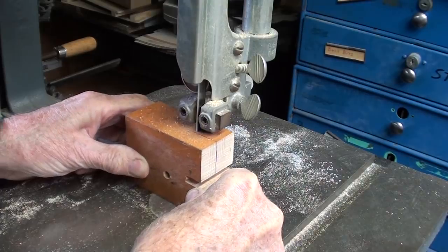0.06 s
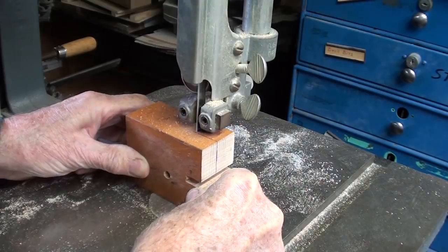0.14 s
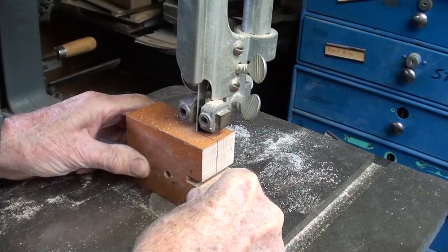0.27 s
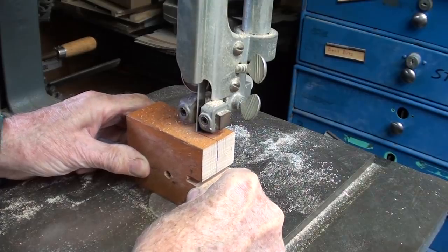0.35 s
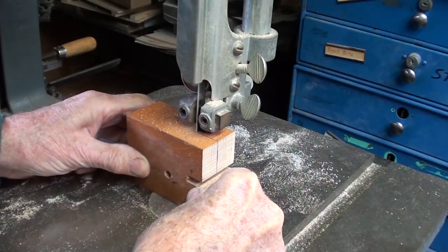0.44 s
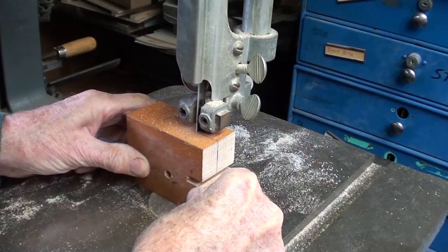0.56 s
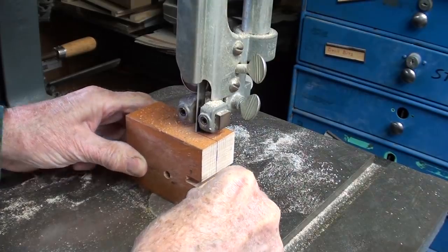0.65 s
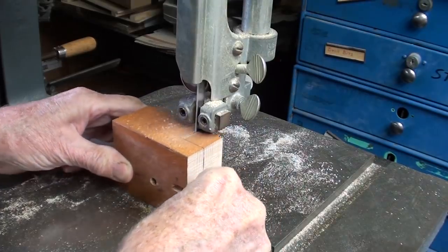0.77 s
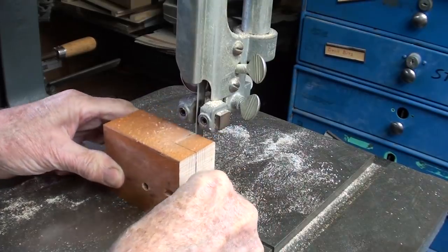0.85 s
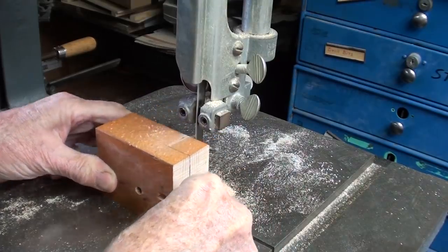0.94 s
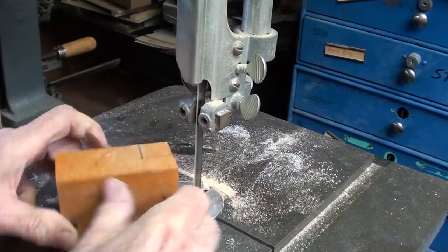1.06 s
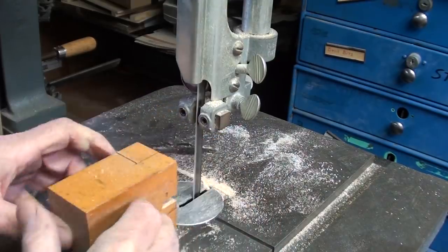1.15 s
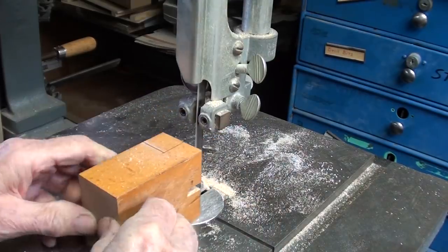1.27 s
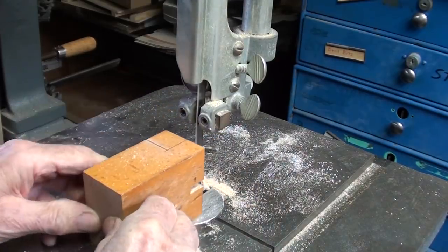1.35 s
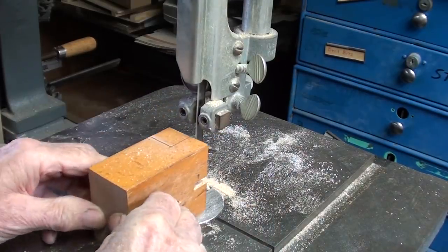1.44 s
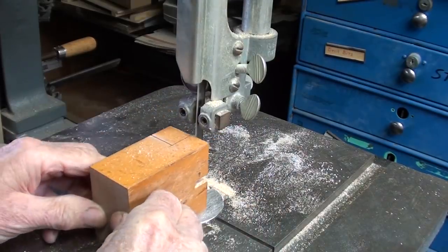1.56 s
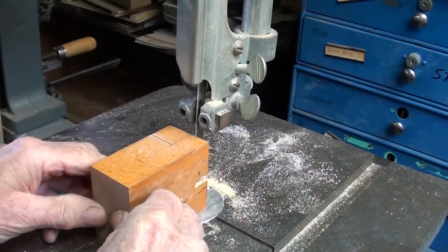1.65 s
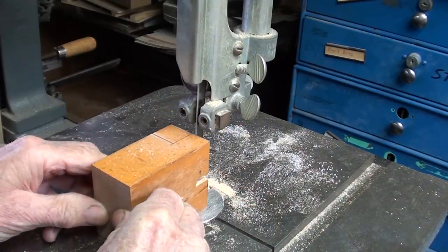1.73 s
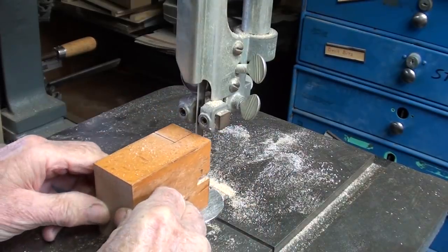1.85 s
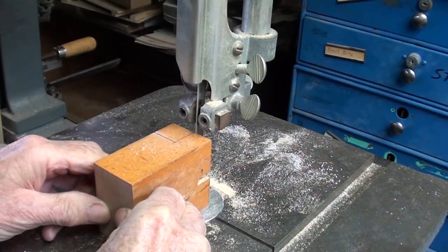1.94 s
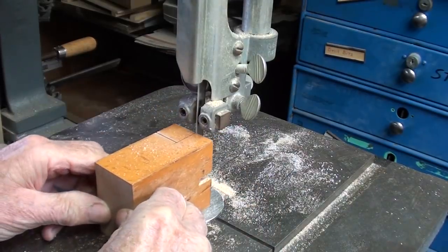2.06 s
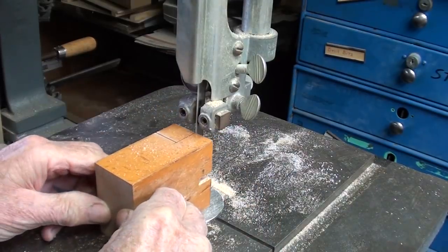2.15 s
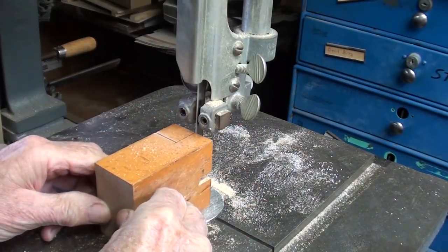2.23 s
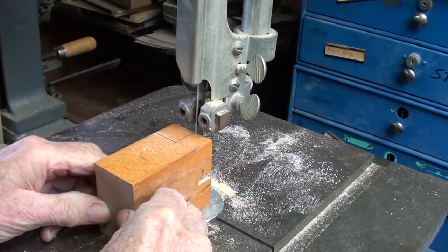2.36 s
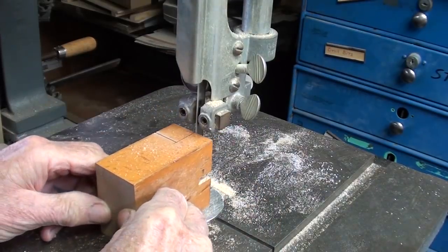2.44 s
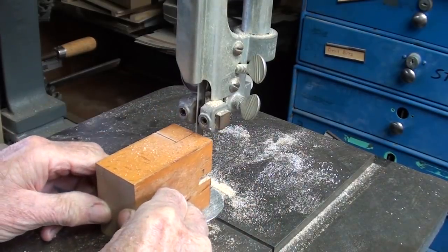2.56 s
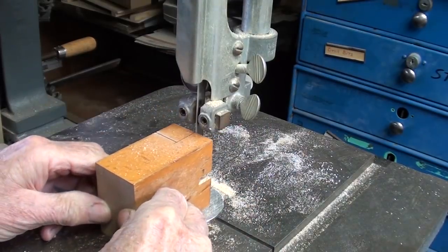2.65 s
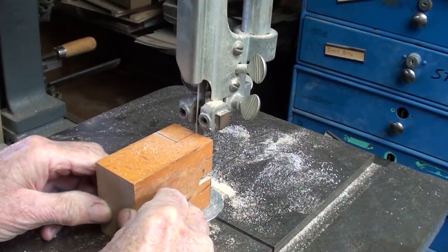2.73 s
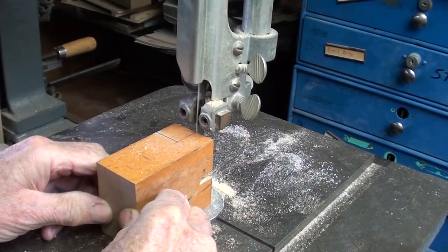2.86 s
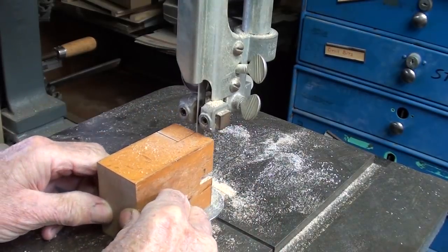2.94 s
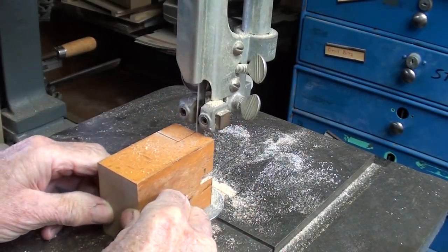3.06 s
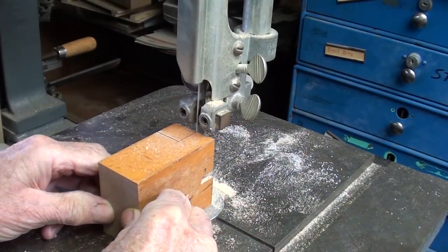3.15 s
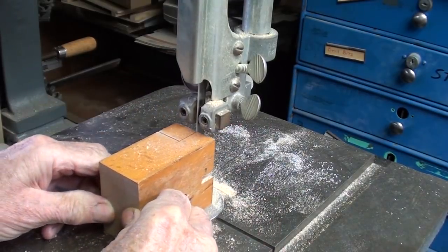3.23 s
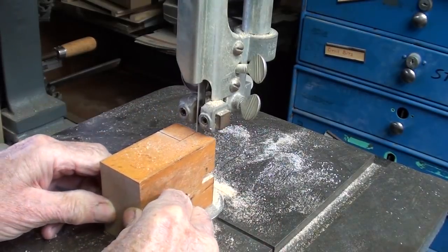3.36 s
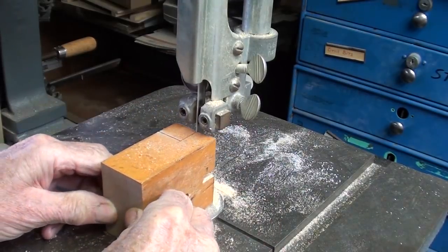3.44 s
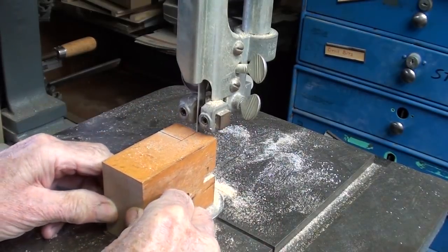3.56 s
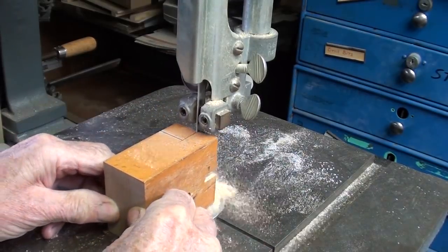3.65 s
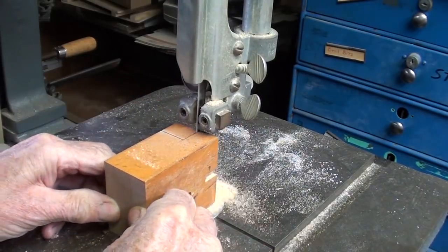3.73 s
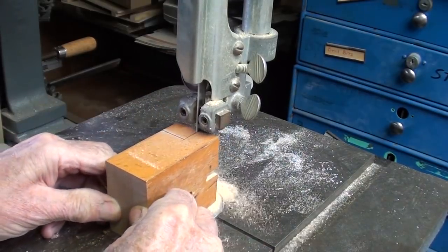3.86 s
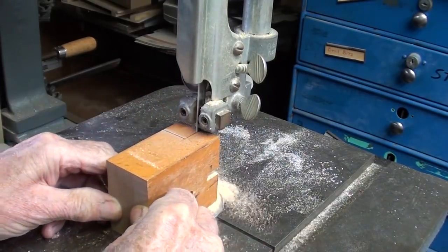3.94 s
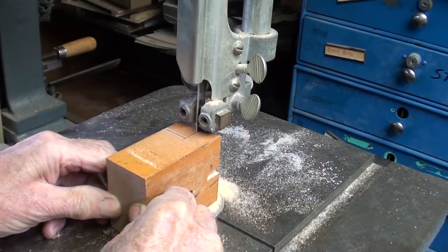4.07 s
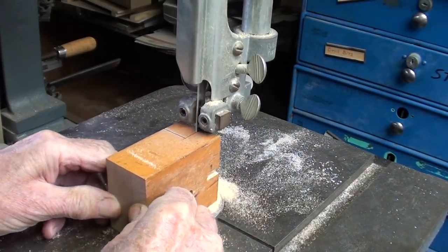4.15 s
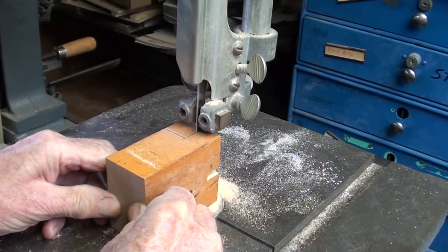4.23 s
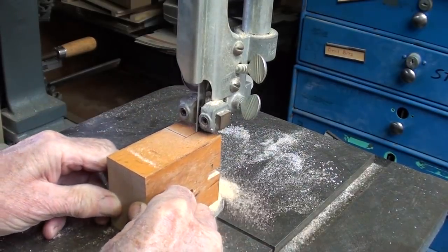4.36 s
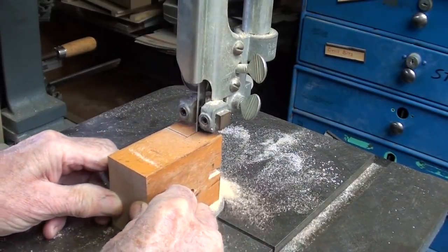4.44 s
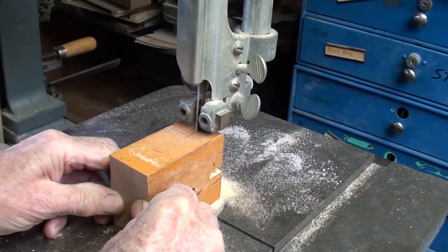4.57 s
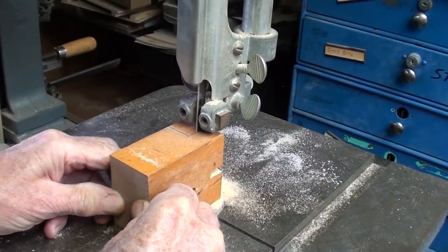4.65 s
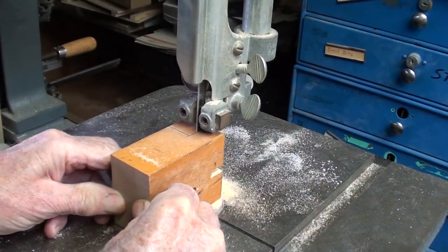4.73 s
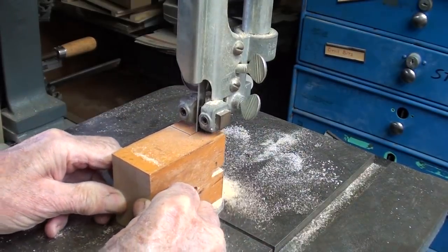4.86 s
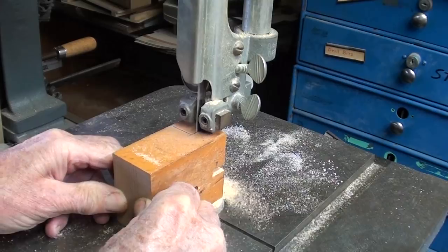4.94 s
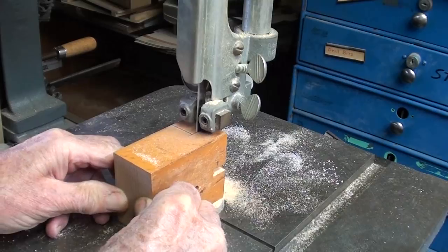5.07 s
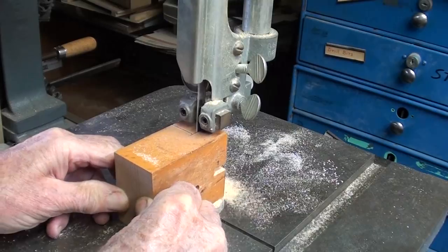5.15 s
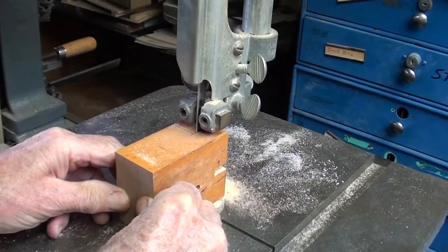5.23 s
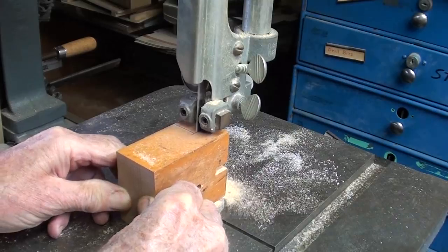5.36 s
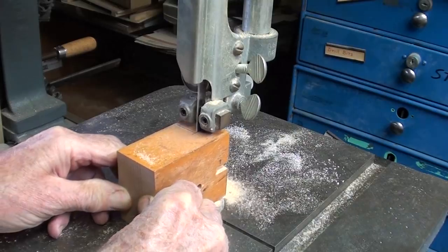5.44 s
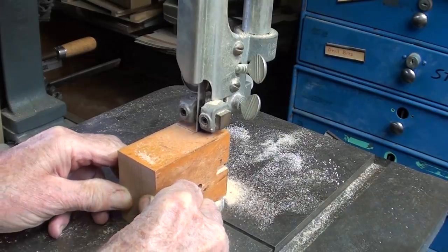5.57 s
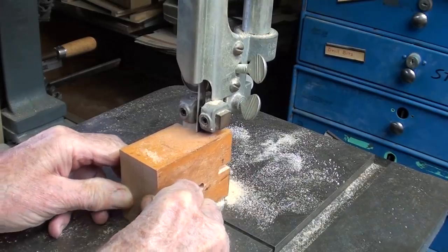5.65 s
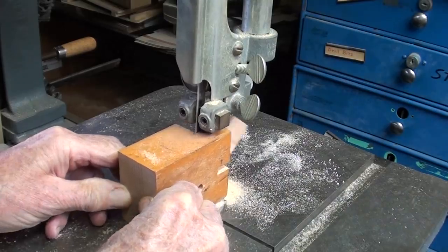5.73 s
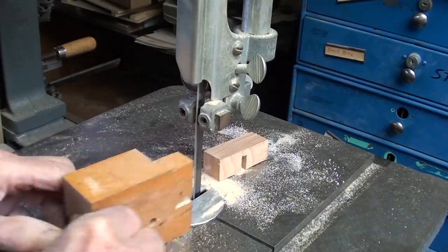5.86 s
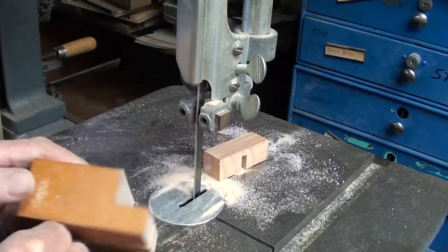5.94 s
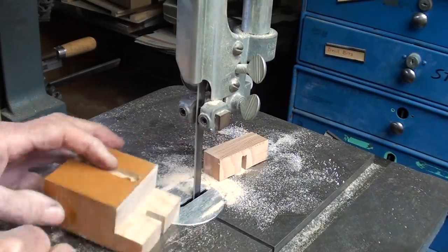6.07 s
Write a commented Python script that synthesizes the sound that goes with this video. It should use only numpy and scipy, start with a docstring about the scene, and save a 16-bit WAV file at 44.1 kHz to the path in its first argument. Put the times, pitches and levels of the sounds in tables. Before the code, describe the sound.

Close stereo sound of a bandsaw in a small workshop with short, faint echoes. From 0 to 0.95 seconds the teeth sing in a wooden block, a raspy whine around 1.5 kilohertz climbing slightly, with bright overtones, grainy chip hiss and tiny skips; short high squeaks mark the end. From 1 to 2.7 seconds only the machine idles, a hollow humming and rushing noise that swells, with soft stuttering scrapes and squeaks of the blade. Around 2.8 the whine bites again, fluttering and sagging, dropping markedly near 3.7 to a squealing lower pitch, then recovering until 4.2. After a brief, quieter gap, a third cut begins at 4.4, squeals low around 4.6, then jumps and wavers roughly. At about 5.74 a dull woody knock sounds as the off-cut breaks free; the cut stops by 5.85 with a faint clack, leaving quiet idle.

```python
"""In a workshop, a bandsaw cuts into a wooden block that is fed in, drawn back and fed again.
The teeth strike the wood and sing at a rate that sags and jumps; left- and right-set teeth add half-rate
tones, and the chips hiss. The blade skips and rubs in short bursts, and near the end an off-cut drops.
Beneath it all the machine idles: noise ringing its frame, motor tones and hiss at the blade guides.
Short echoes of the room surround the sound in stereo."""
import sys
import numpy as np
from scipy import signal
from scipy.fft import rfft, irfft, next_fast_len
from scipy.io import wavfile
from scipy.ndimage import uniform_filter1d, minimum_filter1d

SR = 44100
rng = np.random.default_rng(int(sys.argv[2]) if len(sys.argv) > 2 else 0)


def master_out(mix):
    """Clip the mix to full scale and print it as 16-bit PCM to the path in sys.argv[1]."""
    frames = np.transpose(np.atleast_2d(mix))
    ceiling = np.clip(frames, -1, 1)
    pcm = np.round(ceiling * 32767).astype(np.int16)
    wavfile.write(sys.argv[1], SR, pcm)


N = 269010


def from_db(db):
    """Turns decibels into gain."""
    return 10 ** (np.asarray(db) / 20)


def rms_one(x):
    """Scales a sound to an rms of 1."""
    return x / np.sqrt(np.mean(x ** 2) + 1e-20)


def in_time(tables):
    """Reads table columns at every sample with rounded corners; adds a gate that closes between tables."""
    t = np.arange(N) / SR
    s, *columns = np.transpose(np.concatenate(tables))
    is_open = np.zeros(N, bool)
    for rows in tables:
        is_open |= (t >= rows[0][0] - .004) & (t < rows[-1][0] + .004)
    curves = [np.interp(t, s, column) for column in columns]
    return [uniform_filter1d(curve, size=300) for curve in curves + [is_open * 1.]]


def at_hz(points, hz):
    """Reads a spectrum between its points on a log-frequency axis."""
    point_hz, value = np.array(points).T
    return np.interp(np.log(hz), np.log(point_hz), value)


def drift(rate):
    """Slow random movement of spread 1: noise through two equal low-passes with their corner at rate [Hz]."""
    # worked out at every 20th sample only; the first 2000 values let the filter settle
    r = np.exp(-40 * np.pi * rate / SR)
    noise = rng.standard_normal(N // 20 + 2002)
    slow = signal.lfilter([1], [1, -2 * r, r * r], noise)[2000:]
    return np.interp(np.arange(N) / 20, np.arange(len(slow)), rms_one(slow - slow.mean()))


def resonance(x, hz, width_hz):
    """Rings at one frequency, as a two-pole band-pass with gain 1 on top; a narrow one rings longer."""
    r = np.exp(-np.pi * width_hz / SR)
    poles = [1, -2 * r * np.cos(2 * np.pi * hz / SR), r * r]
    return signal.lfilter([(1 - r * r) / 2, 0, (r * r - 1) / 2], poles, x)


def coloured(x, spectrum):
    """Gives white noise a spectrum and an rms of 1."""
    size = next_fast_len(N)
    hz = np.arange(size // 2 + 1) * SR / size + 1
    return rms_one(irfft(rfft(x, size) * from_db(at_hz(spectrum, hz)), size)[:N])


def teeth(whine_db, octave_db, top_db, half_db, chips_db, skip_db, slack, wobble_hz, jitter, flicker_db):
    """Teeth striking wood make tones on multiples of their rate, fluttering as uneven teeth pass."""
    # tooth rate, one table a cut: (time [s], rate [Hz])
    rate_table = [
        [(0.0, 1408), (0.048, 1511), (0.22, 1500), (0.3, 1528), (0.513, 1580), (0.557, 1544), (0.603, 1602),
         (0.72, 1565), (0.76, 1631), (0.93, 1630)],
        [(2.7, 1575), (2.8, 1530), (2.92, 1510), (2.95, 1452), (2.98, 1498), (3.01, 1465), (3.157, 1525),
         (3.263, 1446), (3.45, 1449), (3.524, 1508), (3.55, 1458), (3.565, 1556), (3.616, 1538), (3.64, 1489),
         (3.686, 1450), (3.702, 1220), (3.757, 1175), (3.789, 1190), (3.8, 1426), (3.853, 1508), (3.891, 1563),
         (3.9, 1469), (3.945, 1375), (3.954, 1529), (3.991, 1376), (4.049, 1420), (4.147, 1382), (4.169, 1410),
         (4.18, 1577)],
        [(4.386, 1511), (4.442, 1430), (4.508, 1418), (4.544, 1293), (4.59, 1186), (4.667, 1233), (4.682, 1392),
         (4.7, 1433), (4.706, 1602), (4.785, 1590), (4.817, 1518), (4.859, 1576), (4.905, 1399), (4.929, 1468),
         (4.94, 1367), (4.957, 1440), (4.999, 1445), (5.011, 1371), (5.066, 1498), (5.102, 1458), (5.19, 1502),
         (5.22, 1448), (5.324, 1445), (5.334, 1344), (5.366, 1497), (5.39, 1372), (5.41, 1488), (5.45, 1409),
         (5.517, 1533), (5.567, 1407), (5.585, 1536), (5.629, 1624), (5.653, 1469), (5.695, 1550),
         (5.831, 1510)],
    ]
    # extra tones, after the whine, the chips and the half rate in turn:
    # (multiple of the tooth rate, level above the leading layer [dB], gain per 100 Hz of sag [dB])
    twelfth = [(3, -9.5, -1.14)]
    top_tones = [(5, -6, 0.11), (6, -9, 0.1), (7, -14.5, 0.1), (8, -18, 0.1)]
    set_tones = [(.5, 0.8, 0.1), (1.5, 0.5, 1.3), (2.5, -8.5, 2.4), (3.5, -8, 1.5), (4.5, -16, 2.6)]  # from left- and right-set teeth
    # low tones sit a little sharp: multiple of the tooth rate -> shift [Hz]
    sharp_hz = {.5: 28, 1: 16, 1.5: 16}
    free_hz = 1601  # tooth rate out of the wood
    speed_up = 0.8  # share of the sag won back as the chips break off
    squeal_below_hz = 1310  # under this rate the teeth lock onto a blade resonance
    wander_db, wander_hz = 1, 8  # random swell and fade of single tones

    rate_hz, _ = in_time(rate_table)
    rate_hz = rate_hz + speed_up * slack * (free_hz - rate_hz)
    sag = (free_hz - rate_hz) / 100
    t = np.arange(N) / SR
    loose = np.clip((rate_hz - squeal_below_hz) / 60 + 1, .3, 1)  # a locked squeal is cleaner
    wobbling_hz = rate_hz + loose * wobble_hz * drift(27.9)
    phase = 2 * np.pi * np.cumsum(wobbling_hz) / SR + loose * jitter * drift(75)
    shared = drift(42)  # flicker common to all tones and the chips

    tones = [(1, whine_db + skip_db),
             (2, octave_db + wander_db * loose * drift(wander_hz)),
             (4, top_db)]
    for table, lead_db in [(twelfth, whine_db), (top_tones, chips_db), (set_tones, half_db)]:
        for k, db, sag_db in table:
            tones.append((k, lead_db + db + sag_db * sag + wander_db * drift(wander_hz)))

    out = 0
    for k, level_db in tones:
        # a scattered part beats against the steady one, most in the top tones
        scatter = loose * (.27 if k == 1 else 0.71 + 0.039 * k)
        speed_hz = 60 if k <= 1.5 else 22 + 15 * k  # the low tones chatter
        turn = k * phase + 2 * np.pi * (sharp_hz.get(k, 0) * t + rng.random())
        beat = 1 + scatter * (drift(speed_hz) + 1j * drift(speed_hz))
        beat = beat / np.sqrt(.5 + scatter ** 2)
        tone = (beat * np.exp(1j * turn)).real
        out = out + from_db(level_db + flicker_db * loose * shared) * tone
    return out, phase, shared


def kerf(chips, phase, shared, gated, grain_db, hiss_db):
    """Chips hiss as grainy noise that swells with the teeth and pairs of teeth, and stutters with a roller."""
    # colour of the chip hiss: (frequency [Hz], level [dB])
    chip_colour = [(88, -35), (150, -30.5), (584, -20), (752, -9.5), (1130, -20.5), (1480, -2.5),
                   (1840, -15), (2930, -14.5), (3290, -13), (4400, -11), (4760, -9.5), (9950, -16),
                   (15600, -29.5)]
    t = np.arange(N) / SR
    grains = rng.standard_normal(N) * from_db(grain_db * drift(430))
    swell = 1 + gated * np.cos(phase) + 0.5 * np.cos(phase / 2)
    # a fast roller, 66.6 turns a second
    roller = 1 + 0.3 * np.cos(2 * np.pi * 66.6 * t) + 0.17 * np.cos(2 * np.pi * 133.2 * t)
    hiss = coloured(grains * swell, chip_colour)
    return from_db(hiss_db + 0.59 * shared) * chips * roller * hiss


def skipping():
    """The blade skips in the cut, briefly changing the whine and the chips; gives both changes in dB."""
    # skips: (time [s], change of the whine [dB], change of the chips [dB], length [s])
    skips = [(0.058, -7, -2, 0.0084), (0.131, -24, -0.5, 0.0057), (0.164, -15, -3.5, 0.0069),
             (0.19, -16, 3, 0.01), (0.351, -9, 0, 0.0044), (0.436, -20, 0.5, 0.0073),
             (0.49, -9.5, -9.5, 0.023), (0.529, -11, -1, 0.0044), (0.557, -18, -1.5, 0.005),
             (0.587, -17, -6.5, 0.012), (0.636, -10, -3.5, 0.0065), (0.66, -22, -8.5, 0.0087),
             (0.741, -4, -2, 0.0065), (0.841, -28, 1.5, 0.038), (3.017, -15, -0.5, 0.0048),
             (3.13, -7, -5, 0.0092), (3.401, -4, -11.5, 0.0099), (3.617, -11, -7.5, 0.013),
             (3.783, -29, -1, 0.0052), (3.841, -18, -12.5, 0.02), (3.875, -4, -6, 0.0064),
             (4.169, -5, -8, 0.0073), (4.727, 3, -7, 0.0081), (4.833, -5, -1.5, 0.01),
             (4.905, -8, -0.5, 0.0085), (5.125, -10, -6.5, 0.014), (5.175, -12, -9, 0.018),
             (5.341, -16, -2, 0.0056), (5.597, -4, -5, 0.014), (5.749, -6, -14.5, 0.0218)]
    t = np.arange(N) / SR
    change_db = np.zeros((2, N))
    for s, whine_db, chips_db, length in skips:
        bump = np.exp(-((t - s) / length) ** 2 * 2)
        change_db += np.outer([whine_db, chips_db], bump)
    return change_db


def ringing_body(cut):
    """Blade and block resonances flare as a tone of the cut sweeps through them."""
    # resonances of blade and block: (frequency [Hz], width [Hz], level [dB])
    body = [(1206, 43, -7), (1530, 89, -8), (2370, 8, -3.5), (2795, 16, 3), (2856, 11, 4.5), (4350, 91, -3),
            (4450, 15, -24), (6000, 24, -32)]
    return sum(from_db(db) * resonance(cut, hz, width) for hz, width, db in body)


def rubs():
    """The blade rubs on a guide or the cut: stuttering rough noise rings the guide, with a squeak in it."""
    # rubs: (time [s], relative level [dB], squeak [Hz], scuff above the squeak [dB], length [s])
    rub_table = [(0.708, 3.5, 4840, -3, 0.041), (0.835, -7.5, 5120, -1, 0.072),
                 (0.901, 5.5, 4830, -7.5, 0.048), (1.112, -18, 4100, 0.5, 0.055),
                 (1.326, -29, 4170, 2, 0.046), (1.509, -10, 4150, -1.5, 0.064), (1.91, -9, 4150, -6, 0.068),
                 (2.087, -11.5, 5300, 1.5, 0.08), (2.157, -19, 5400, 6, 0.062),
                 (2.267, -18, 5300, 4, 0.064), (2.323, -14.5, 4120, 0, 0.069),
                 (2.5193, -9.5, 5300, 5.5, 0.036), (2.668, -13.5, 5270, -4, 0.046)]
    # guide block resonances: (frequency [Hz], width [Hz], level [dB])
    guide = [(4570, 39, -10), (5230, 300, -16), (7740, 400, -21.5)]
    out = np.zeros(N)
    stutter_db = 2.5 * drift(250) + 2 * drift(60)
    rough = rms_one(rng.standard_normal(N) * from_db(stutter_db))
    band = signal.butter(2, [1500, 7500], "band", fs=SR, output="sos")
    scuff = rms_one(signal.sosfilt(band, rough))
    scuff = scuff + sum(from_db(db) * rms_one(resonance(rough, hz, width)) for hz, width, db in guide)
    for s, db, hz, scuff_db, length in rub_table:
        start, size = int(s * SR), int(max(length, .01) * SR)
        part = slice(start, start + size)
        squeak = rms_one(resonance(resonance(rough[part], hz, 220), hz, 1100))
        shape = np.sin(np.pi * np.linspace(0, 1, size) ** 0.62)  # rises faster than it falls
        out[part] += from_db(db - 17) * shape * (squeak + from_db(scuff_db) * scuff[part])
    return out


def offcut():
    """The off-cut breaks free, then drops on the table: a burst of contacts rings the small piece."""
    # knocks: (time [s], relative level [dB], thud above the clack [dB])
    drop = [(5.739, -16.5, 7.5), (5.874, -22.5, -24)]
    # ringing tones of the piece, thud first: (frequency [Hz], level [dB], ring time that sets the width [s])
    piece = [(408, -3, 0.098), (1290, 7, 0.0079), (2190, 2.5, .01), (3740, -8, .008)]
    out, t = np.zeros(N), np.arange(5000) / SR
    for s, db, thud_db in drop:
        fade = from_db(-60 * t / 0.089)  # down 60 dB in 89 ms
        contacts = rng.standard_normal(len(t)) * fade * np.minimum(1, t / 0.0025)
        thud, *rings = [from_db(level_db) * rms_one(resonance(contacts, hz, 2.9 / ring_s))
                        for hz, level_db, ring_s in piece]
        crack = from_db(-10.0) * rms_one(resonance(contacts, 1500, 3000))
        start = int(s * SR)
        out[start:start + len(t)] += from_db(db - 26.0) * (from_db(thud_db) * thud + sum(rings) + crack)
    return out


def idling(frame_db, wash_db):
    """The idling machine: running noise keeps the frame ringing, with motor tones and hiss at the guides."""
    # the idle level rises and sinks through the scene, before its slow drift: (time [s], level [dB])
    idle = [(0.0, -32), (0.83, -35), (1.0, -32.5), (1.68, -28.5), (1.97, -26.5), (2.56, -25.5), (2.67, -27),
            (2.79, -26.5), (2.89, -36), (3.64, -42.5), (4.25, -46.5), (4.55, -50.5), (4.99, -49.5),
            (6.1, -44)]
    # colour of the running noise: (frequency [Hz], level [dB])
    idle_colour = [(15, -78), (25, -42), (156, -21.5), (240, -9.5), (297, -7.5), (400, -1.5), (567, -11),
                   (704, -11.5), (784, -16.5), (1210, -18), (1670, -16), (1850, -14), (2700, -25),
                   (3800, -26.5), (4500, -22), (7930, -22), (15600, -43)]
    # frame and wheel resonances: (frequency [Hz], width of the narrower filter [Hz], level [dB])
    frame_table = [(235.3, 32.5, 0), (380, 91, -12), (726, 38, -4.5), (1195, 140, -11.5),
                   (1512, 110, -13.5), (1803, 19, -1.5), (1944, 25, -4), (2287, 14.5, -9)]
    # steady motor tones: (frequency [Hz], level above the idling level [dB])
    motor_table = [(242, -9.5), (1200, -8.5), (1922, -10.5), (2287, -17)]
    # blade sliding in the guides: (frequency [Hz], width of each of two filters [Hz], level [dB])
    guide_hiss = [(7920, 200, -33), (9800, 160, -20.5)]
    level_db, _ = in_time([idle])
    shake, t = rng.standard_normal(N), np.arange(N) / SR
    frame = 0
    for k, (hz, width, db) in enumerate(frame_table):
        ring = resonance(resonance(shake, hz, width), hz, 2 * width)
        frame = frame + from_db(db) * (-1) ** k * ring
    wash = coloured(rng.standard_normal(N) * from_db(1.55 * drift(130)), idle_colour)
    motor = 0
    for hz, db in motor_table:
        turn = 2 * np.pi * hz * t + 1.05 * drift(3.2)
        motor = motor + from_db(db + 2.0 * drift(4.5)) * np.cos(turn)
    guides = sum(from_db(db) * rms_one(resonance(resonance(shake, hz, width), hz, width))
                 for hz, width, db in guide_hiss)
    machine = from_db(frame_db) * rms_one(frame) + from_db(wash_db) * wash + motor + guides
    return from_db(level_db + 1.65 * drift(1.03)) * machine


def workshop(x):
    """Room echoes: eight repeating delays a side, weaker and duller on every round."""
    fade_s, wall_cut_hz = 0.25, 3500  # time to fall 60 dB in the bass; corner of the dulling
    size = next_fast_len(N + SR)
    w = 2 * np.pi * np.arange(size // 2 + 1) / size
    dull = np.exp(-2 * np.pi * wall_cut_hz / SR)
    wall = (1 - dull) / (1 - dull * np.exp(-1j * w))
    walls = np.zeros((2, len(w)), complex)
    lags = (rng.uniform(.012, .04, 16) * SR).astype(int)
    for k, lag in enumerate(lags):
        loop = from_db(-60 * lag / SR / fade_s) * wall * np.exp(-1j * w * lag)
        walls[k % 2] += loop / (1 - loop) * (-1) ** (k // 2)
    return irfft(walls * rfft(x, size), size)[:, :N]


def two_ports(x):
    """Direct sound reaches left and right with a small step in level and phase, half on each side."""
    # left above right: (frequency [Hz], level [dB])
    louder_left = [(30, 0), (250, 1.8), (500, 1.0), (1200, 1.7), (2500, .4), (4500, -.1), (15000, 0)]
    # left ahead of right: (frequency [Hz], phase [radians])
    left_leads = [(0, 0), (860, 0.24), (2760, 0.19), (5600, 0.4), (8200, 0.27), (12000, 0), (15200, 0.01)]
    size = next_fast_len(N)
    hz = np.arange(size // 2 + 1) * SR / size + 1
    left = from_db(at_hz(louder_left, hz) / 2) * np.exp(.5j * at_hz(left_leads, hz))
    return irfft(rfft(x, size) * np.array([left, 1 / left]), size)[:, :N]


def scene():
    """Mixes the cuts, rubs and off-cut over the idling machine, and adds the room."""
    # bite of the teeth before the skips, one table a cut: (time [s], whine [dB], octave [dB],
    # double octave [dB], half rate [dB], chip hiss [dB])
    bite = [
        [(0.0, -19, -21, -21, -22.5, -25.5), (0.08, -27.5, -14.5, -21, -37, -26.5),
         (0.14, -11.5, -5.5, -15, -29, -20.5), (0.19, -19.5, -19.5, -34, -21.5, -22),
         (0.3, -19, -22.5, -35, -29.5, -21), (0.4, -17.5, -22.5, -32, -29.5, -24),
         (0.55, -11, -20, -37, -27.5, -19.5), (0.62, -18, -35, -39, -38, -32.5),
         (0.66, -18.5, -43, -35, -52, -26.5), (0.71, -14, -23, -41, -25.5, -29.5),
         (0.77, -27.5, -36, -40, -44, -28.5), (0.88, -24.5, -36, -42, -64, -29.5),
         (0.935, -42, -31, -43, -54, -25), (0.96, -50, -41, -55, -55, -56)],
        [(2.55, -56, -60, -55, -58, -33), (2.66, -29, -50, -47, -54, -32.5), (2.77, -26, -40, -44, -51, -30),
         (2.815, -15.5, -13, -23, -33.5, -23.5), (2.93, -14.5, -28, -25, -28, -22.5),
         (2.975, -22.5, -27, -23, -31.5, -22), (3.07, -13.5, -13.5, -15, -35, -19.5),
         (3.16, -14.5, -24, -26, -34, -21.5), (3.25, -13.5, -22, -20, -29, -20),
         (3.38, -18.5, -22.5, -20.5, -32, -23), (3.45, -13.5, -24, -24, -40, -23.5),
         (3.6, -17, -27, -32, -34, -24.5), (3.69, -11.5, -16.5, -22, -36, -21.5),
         (3.75, -9.5, -11.5, -23, -50, -23.5), (3.81, -16, -21.5, -29.5, -35, -24.5),
         (3.88, -23, -38, -31, -48, -27.5), (3.91, -12.5, -18.5, -34, -25, -23.5),
         (4.01, -13, -15, -25, -30, -23.5), (4.075, -8.5, -22.5, -23, -29, -18),
         (4.11, -18, -13.5, -27.5, -37, -23.5), (4.188, -20, -35, -29, -40, -23),
         (4.21, -35, -44, -50, -54, -38), (4.24, -45, -66, -62, -66, -39.5), (4.345, -47, -58, -55, -60, -41)],
        [(4.35, -37, -40.5, -50, -55, -34.5), (4.378, -17, -33, -27.5, -39, -26.5),
         (4.43, -10, -17.5, -29, -26, -24.5), (4.53, -17, -23, -24, -43, -21),
         (4.565, -6.5, -27, -28, -52, -20.5), (4.606, -12, -1, -23, -39, -21), (4.65, -7, -21, -25, -46, -24),
         (4.685, -25, -32, -46, -42, -31.5), (4.73, -24.5, -35.5, -46, -54, -34.5),
         (4.83, -20.5, -31, -37.5, -36, -32), (4.862, -23, -29, -48, -40, -32.5),
         (4.88, -12.5, -25, -33.5, -19, -23), (4.96, -15.5, -27, -37, -33, -26.5),
         (5.02, -15.5, -23, -28, -39.5, -24.5), (5.08, -10, -20, -30, -19.5, -20.5),
         (5.15, -16, -27, -40, -28, -26.5), (5.23, -12.5, -21.5, -28, -27, -24),
         (5.38, -11.5, -21, -27, -25.5, -22), (5.52, -15.5, -23.5, -37, -25.5, -24.5),
         (5.57, -15, -23.5, -18, -33, -25), (5.62, -24, -47, -47, -36.5, -30),
         (5.65, -17, -23.5, -34, -22.5, -25.5), (5.79, -18, -24.5, -42, -27, -27.5),
         (5.815, -36, -43, -50, -36, -38), (5.85, -53, -55, -61.5, -53, -60)],
    ]
    *tones_db, chips_db, cutting = in_time(bite)
    whine_dip_db, chip_dip_db = skipping()
    tones_db = [db + chip_dip_db for db in tones_db]
    chips_db = chips_db + chip_dip_db
    slack = 1 - from_db(chip_dip_db)
    tones, phase, shared = teeth(*tones_db, chips_db, whine_dip_db - chip_dip_db, slack,
                                 wobble_hz=8, jitter=0.17, flicker_db=3.0)
    chips = kerf(from_db(chips_db), phase, shared, gated=0.24, grain_db=1.0, hiss_db=2.0)
    cut = cutting * (tones + chips)
    cut = cut + ringing_body(cut)
    saw = cut + rubs() + offcut() + idling(frame_db=-0.5, wash_db=2.0)
    return two_ports(saw) + from_db(-26.5) * workshop(saw)


def record(dry):
    """A limiter holds the peaks down; the deepest bass and the top treble are cut."""
    limit, cutoff_hz = 0.56, 15850
    needed = np.minimum(1, limit / (np.abs(dry).max(axis=0) + 1e-9))
    gain = uniform_filter1d(minimum_filter1d(needed, size=200), size=300)
    low_cut = signal.butter(2, 30, "high", fs=SR, output="sos")
    top_cut = signal.cheby2(16, 60, cutoff_hz, fs=SR, output="sos")
    return signal.sosfilt(top_cut, signal.sosfilt(low_cut, dry * gain))


dry = scene()
out = record(dry)
master_out(out)
```